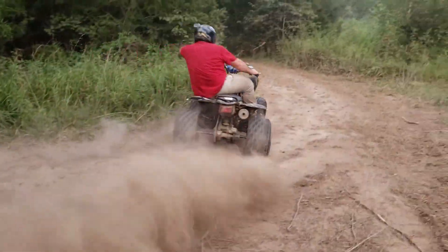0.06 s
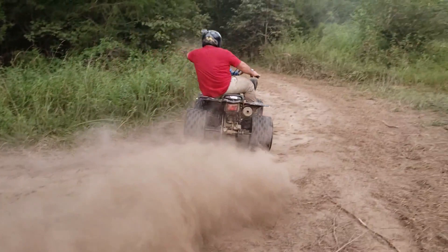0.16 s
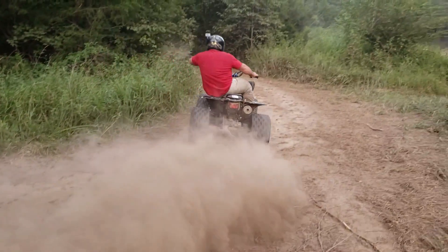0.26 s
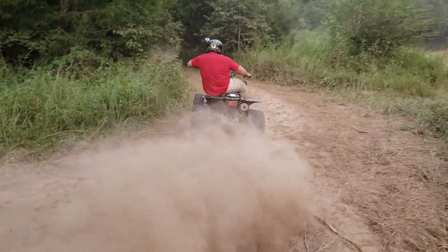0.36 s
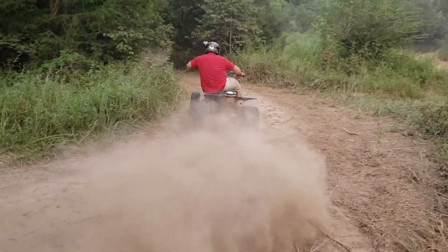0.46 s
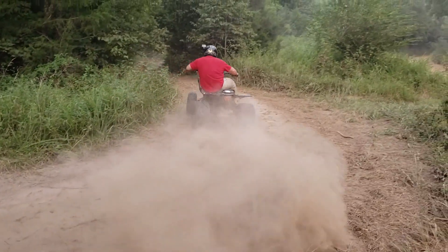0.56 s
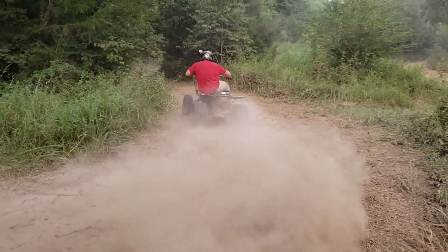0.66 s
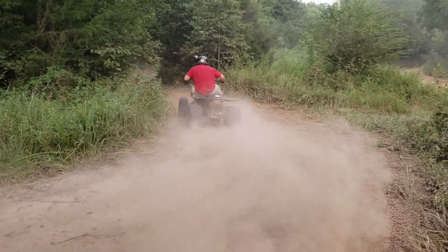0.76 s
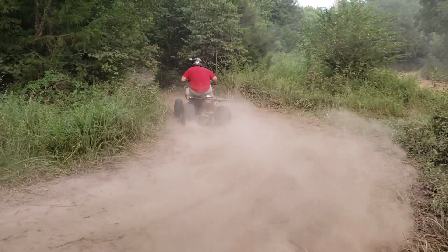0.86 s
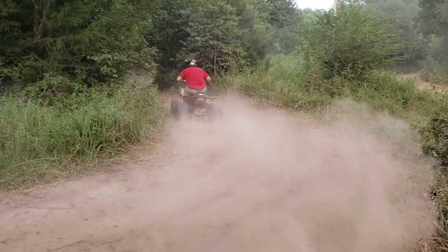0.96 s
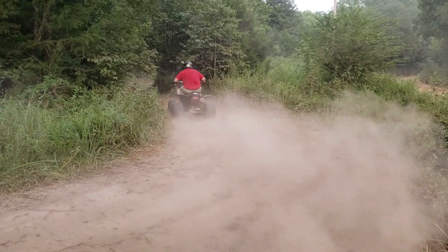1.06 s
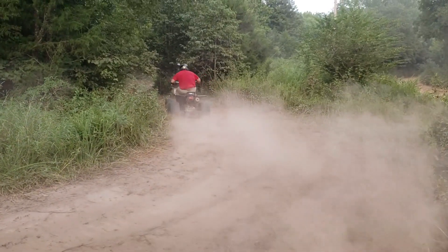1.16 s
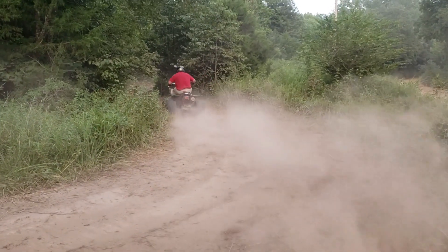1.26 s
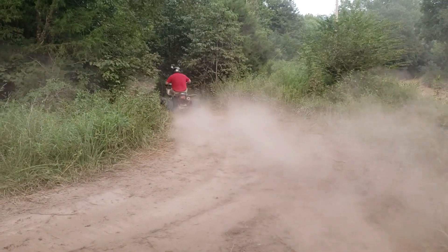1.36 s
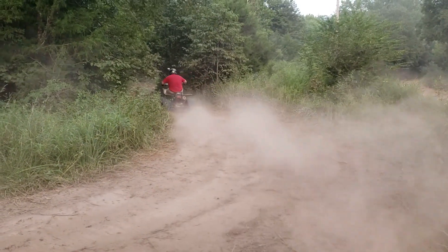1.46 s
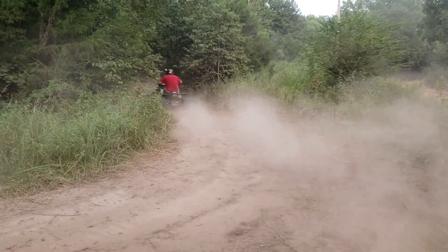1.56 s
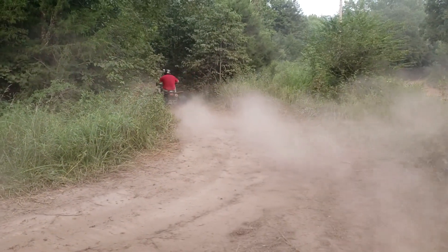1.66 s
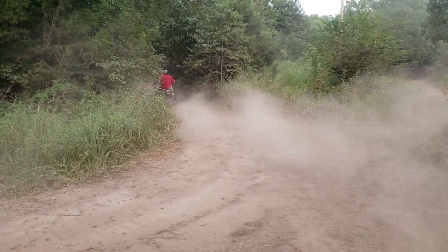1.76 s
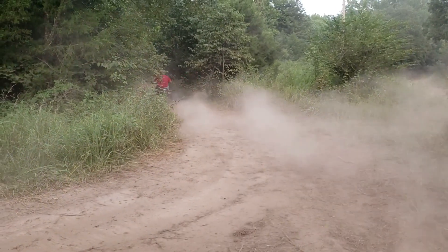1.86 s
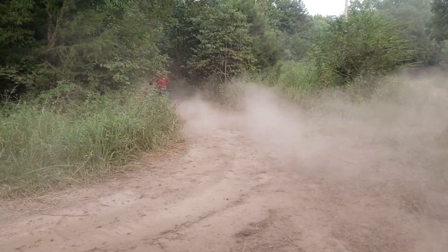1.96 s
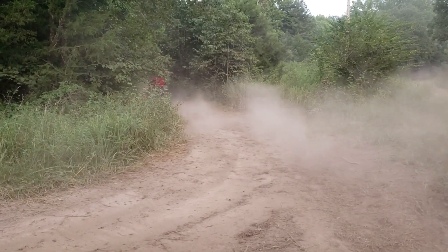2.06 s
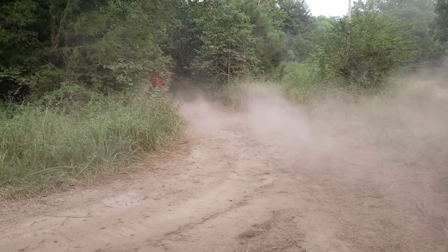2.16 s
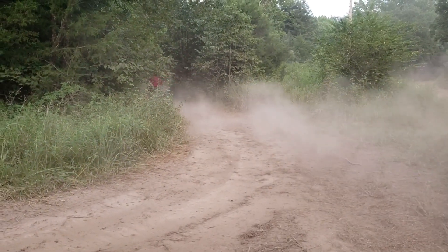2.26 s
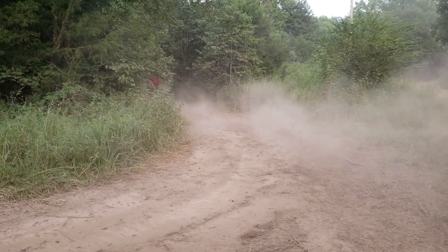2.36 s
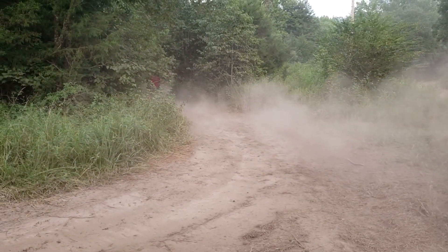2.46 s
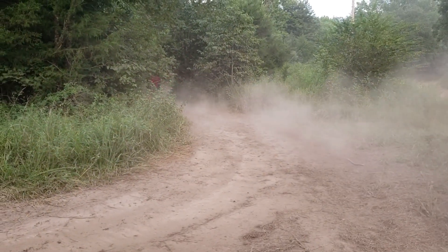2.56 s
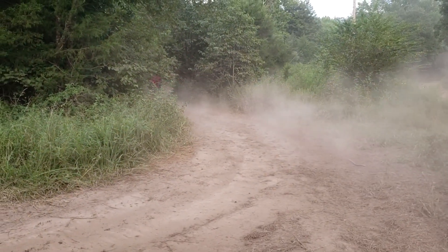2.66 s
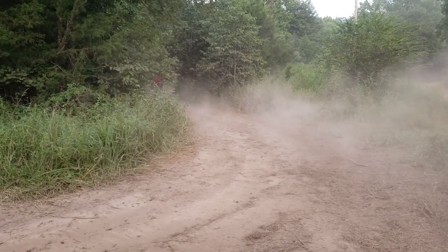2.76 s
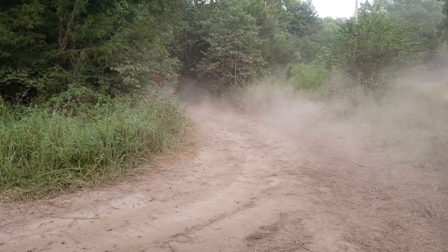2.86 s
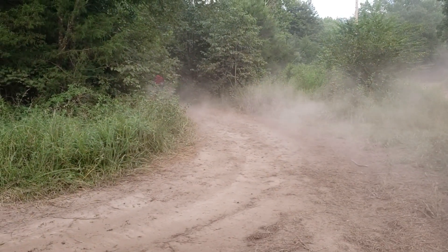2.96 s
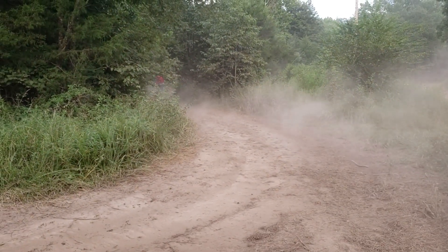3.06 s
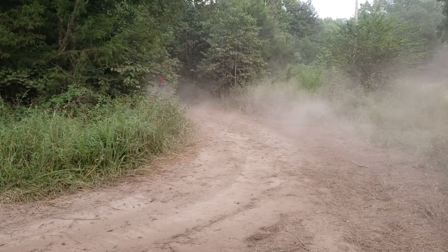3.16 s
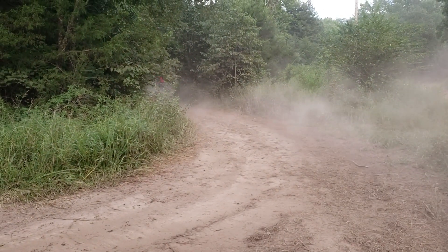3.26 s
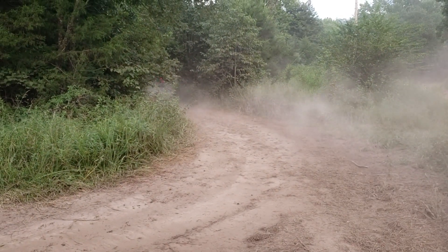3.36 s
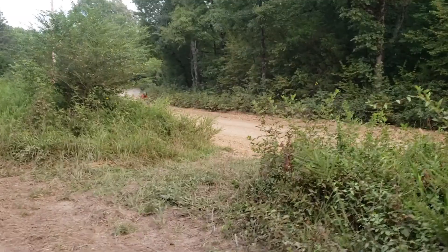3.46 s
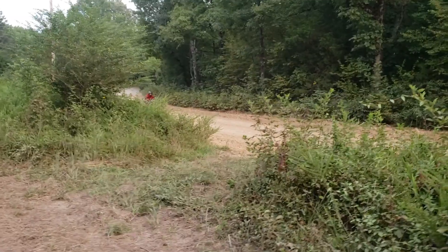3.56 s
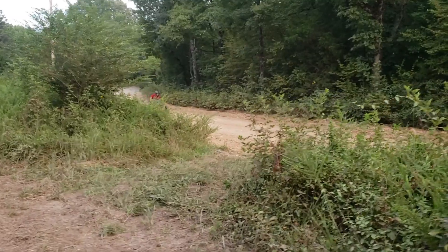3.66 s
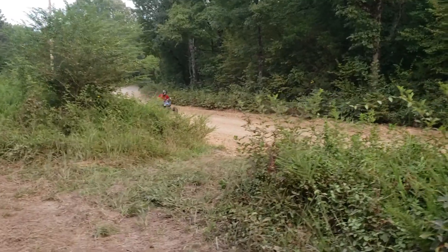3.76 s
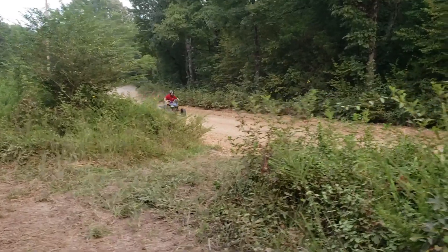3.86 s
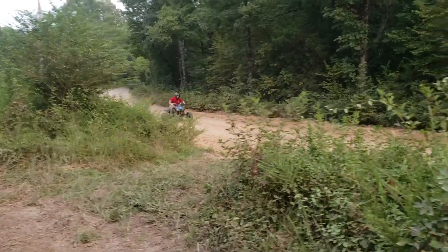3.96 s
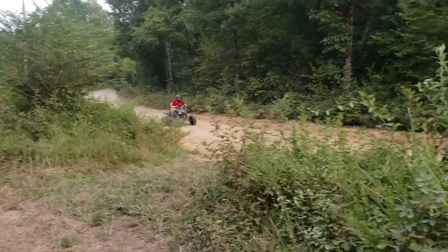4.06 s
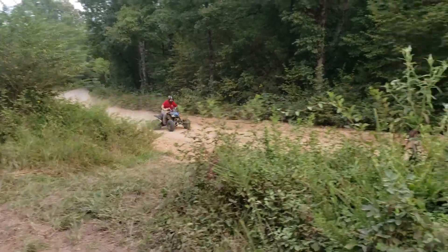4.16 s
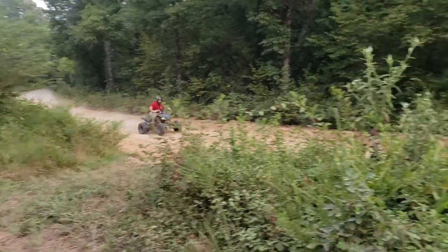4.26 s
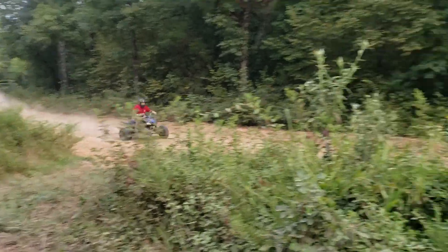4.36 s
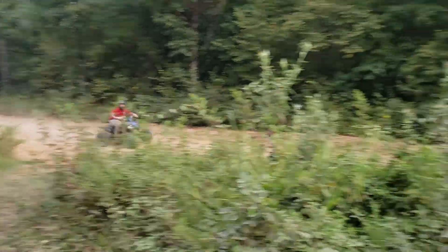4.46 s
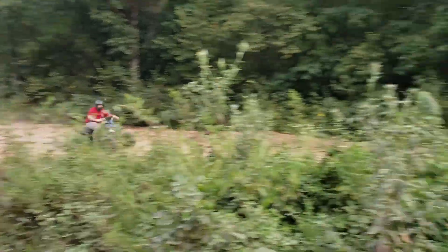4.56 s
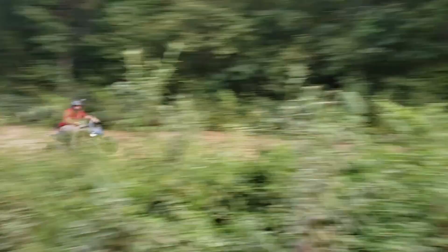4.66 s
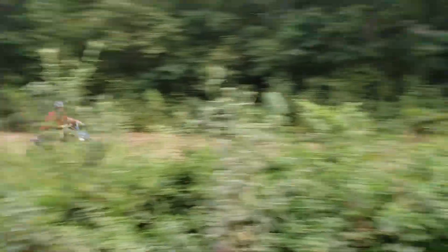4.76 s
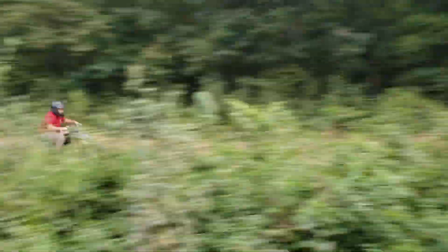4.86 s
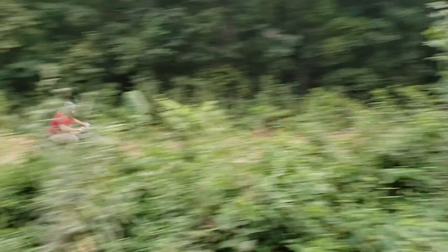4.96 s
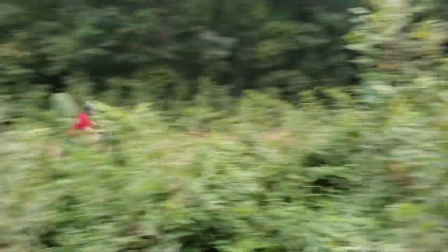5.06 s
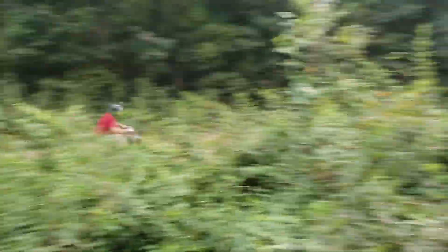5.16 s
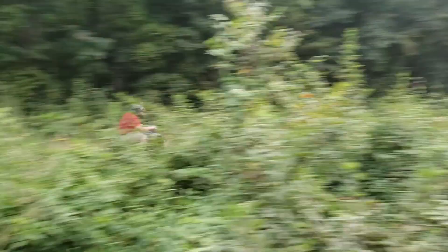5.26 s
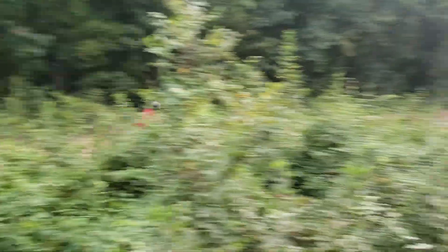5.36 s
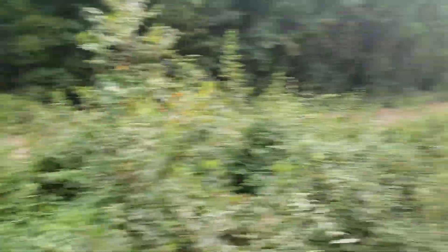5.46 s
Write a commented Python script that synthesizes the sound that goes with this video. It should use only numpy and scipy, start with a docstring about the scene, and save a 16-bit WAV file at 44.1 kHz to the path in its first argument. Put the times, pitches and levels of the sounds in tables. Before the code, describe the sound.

Raspy single-cylinder four-wheeler engine accelerates into the distance, shifting up once, then cuts abruptly to a ragged high-rev pass with another quick upshift.

```python
"""A dirt trail among trees: a single-cylinder quad bike, heard by a small two-port microphone.
First it pulls away with the tailpipe towards us, shifting up once; after a hard cut it comes past
side-on at full revs, firing unevenly, and shifts up again. The exhaust is a sum of firing orders, the
crack is noise in short jets through pipe resonances, roar and clatter are shaped noise, and a few
wavering partials hum beside the engine as it passes."""
import sys
import numpy as np
from scipy import signal
from scipy.io import wavfile
from scipy.ndimage import uniform_filter1d

SR = 44100
rng = np.random.default_rng(int(sys.argv[2]) if len(sys.argv) > 2 else 0)


def dump(signal):
    """Clip the signal to [-1, 1] and save it as 16-bit WAV at the path in sys.argv[1]."""
    limited = np.clip(np.atleast_2d(signal).T, -1, 1)
    pcm = np.round(limited * 32767).astype(np.int16)
    wavfile.write(sys.argv[1], SR, pcm)


N = 243431
CUT_S = 3.448  # hard cut between the two passes
FRAME = 512  # samples in a spectral frame


def amp(db):
    """Decibels to gain."""
    return 10 ** (np.asarray(db) / 20)


def evened(x):
    """Scales to rms 1."""
    return x / np.sqrt(np.mean(x ** 2) + 1e-20)


def read(points, hz):
    """Reads a table on a log-frequency axis."""
    f, value = np.transpose(points)
    return np.interp(np.log(hz + 1), np.log(f + 1), value)


def spectra(x):
    """Short-time spectra: bin frequencies, frame times, values."""
    return signal.stft(x, SR, nperseg=FRAME, noverlap=FRAME * 3 // 4)


def noise_pair(envelope):
    """Spectra of two independent white noises under one envelope: the common sound and one port's own."""
    return spectra(envelope * rng.standard_normal((2, len(envelope))))[2]


def firings(hz, depth, start):
    """Cycle count, strength of each firing and size of its gas jet; uneven firing also shifts the timing."""
    turns = np.cumsum(hz) / SR + start
    count = int(turns[-1]) + 3
    chance = rng.standard_normal((count, 3))
    place = np.arange(count)
    jitter = 0.025 * depth  # cycles
    turns = turns + jitter * np.interp(turns, place, chance[:, 2])
    strength = 1 + depth * np.interp(turns, place, chance[:, 0])
    size = amp(0.96 * chance[:, 1])
    return turns, strength, size


def exhaust(turns, hz, thumps, far, sharp_db, drone_db, thump_db, first_db, spread, skew):
    """One suction-like pulse a firing plus the drone at crank speed; spread smears it, upper orders first."""
    close, away = thumps
    upper = []
    for k in range(3, 23):
        colour_db = (1 - far) * read(close, k * hz) + far * read(away, k * hz)
        upper.append((k, amp(colour_db) * (k * hz < 950)))
    norm = np.sqrt(sum(a ** 2 for k, a in upper if k > 3) / 2)
    thump = 0
    for k, a in upper:
        # sharpness acts above 250 Hz, in full from 500 Hz; a shut throttle softens the pulse
        sharpened = a * amp(sharp_db * np.clip(k * hz / 250 - 1, 0, 1))
        phase = skew + spread * (k * hz / 600) ** 2
        thump = thump + sharpened * np.cos(2 * np.pi * k * turns + phase)
    # the crank turns twice for each firing
    drone = np.cos(4 * np.pi * turns + 2.54) + amp(first_db) * np.sin(2 * np.pi * turns)
    return amp(thump_db) * thump / norm + amp(drone_db) * np.sqrt(2) * drone


def puffs(turns, hz, size, open_s, tail_s, steady):
    """Envelope of the gas jet: opens just before the pulse, blows briefly, then dies away."""
    ahead = turns + 0.0013 * hz  # 1.3 ms early
    since_s = ahead % 1 / hz
    opening = np.minimum(since_s / 0.00031, 1)
    jet = opening * np.exp(-np.maximum(since_s - open_s, 0) / tail_s)
    return evened(size[ahead.astype(int)] * jet + steady)


def modes(table, hz, valley_db, top_hz):
    """Gain of a set of resonances over a valley floor, fading outside the pipe's band."""
    power = sum(amp(db) ** 2 / (1 + ((hz - f) / width) ** 2) ** 2 for f, width, db in table)
    band = hz ** 2 / (hz ** 2 + 1800.0 ** 2) / (1 + (hz / top_hz) ** 4)
    return evened(np.sqrt(power + amp(valley_db) ** 2) * band)


def crack(jet, crack_db, pipes, f, far, valley_db):
    """Hiss of the gas jets, coloured by the silencer's resonances, which change with direction."""
    close_pipe, far_pipe = (modes(p, f, valley_db, top_hz=5500)[:, None] for p in pipes)
    return noise_pair(amp(crack_db) * jet) * ((1 - far ** 2) * close_pipe + far ** 2 * far_pipe)


def roar(jet, roar_db, colour, f, far, throb, bright_db, churn_db, echo):
    """Roar of tyres, chain and engine scattered by the trees: shaped noise throbbing with the jets."""
    gain = amp(read(colour, f))
    gain /= np.sqrt(np.mean((gain * (f > 7000)) ** 2))  # level is set by the hiss above 7 kHz
    f = f[:, None]
    # a narrow bright band near 12 kHz and a low churning band near 700 Hz, strongest while close
    bright = bright_db * (1 - far) * np.exp(-((f - 12200) / 1500) ** 2)
    churn = churn_db * (1 - far) ** 2 * np.exp(-((f - 700) / 400) ** 2)
    # a close echo, from the ground or inside the pipe, cuts hollows 552 Hz apart once the bike is away
    comb = abs(1 + echo * far * np.exp(-2j * np.pi * f / 552) / (1 + (f / 4500) ** 4))
    return noise_pair(amp(roar_db) * (1 + throb * jet)) * gain[:, None] * amp(bright + churn) * comb


def clatter(jet, clatter_db, f, throb, clatter_hz):
    """Mechanical clatter: one broad band of noise throbbing with the jets."""
    gain = evened(np.exp(-((f - clatter_hz) / 1100) ** 2))
    return noise_pair(amp(clatter_db) * (1 + throb * jet)) * gain[:, None]


def bumps(f, frames, lumpy_db):
    """Gain of drifting patches in time and pitch; bumps in the trail make the low roar lumpier than the hiss."""
    patches = rng.standard_normal((len(f), frames))
    patches = evened(uniform_filter1d(uniform_filter1d(patches, size=30, axis=1), size=6, axis=0))
    patch_db = 1.5 + lumpy_db / (1 + (f / 900) ** 2)
    return amp(patch_db[:, None] * patches)


# How alike the two ports hear the noise. Each row: frequency in Hz, share common to both (0-1).
PORT_LIKENESS = [(100, 1), (400, .99), (800, .94), (1400, .75), (3000, .72), (5000, .55), (8000, .35),
                 (15000, .3)]


def two_ports(low, common, own, f, frame_s, balance, lags):
    """Spreads the sound over two ports that differ in colour, arrival time and part of their noise."""
    shared = np.clip(read(PORT_LIKENESS, f), 0, 1)[:, None]
    # the bike is left of the microphone, so the right port hears it later, more so as it moves round
    lag_ms = np.interp(frame_s, [0, frame_s[-1]], lags)
    delay = np.exp(-2j * np.pi * f[:, None] * lag_ms / 1000)
    tilt = amp(read(balance, f) / 2)[:, None]
    left = (low + common) * tilt
    right = (low + shared * common + np.sqrt(1 - shared ** 2) * own) * delay / tilt
    return signal.istft(np.array([left, right]), SR, nperseg=FRAME, noverlap=FRAME * 3 // 4)[1]


def ride(t, control, thumps, pipes, roar_colour, balance, lags, start, first_db, steady, throb, clatter_hz,
         valley_db, bright_db, echo, turn_s, spread, lumpy_db, churn_db):
    """One pass of the bike: exhaust, hum, crack, roar and clatter, as the two ports hear them."""
    hz, drone_db, thump_db, crack_db, roar_db, clatter_db, treble_db, depth, sharp_db = control
    # colours change as the bike turns away from the microphone: 0 before the turn, 1 after
    far = np.interp(t, turn_s, [0, 1])
    turns, strength, size = firings(hz, np.clip(depth, 0, 1), start)
    pulses = exhaust(turns, hz, thumps, far, sharp_db, drone_db, thump_db, first_db, spread, skew=2.3)
    f, frame_s, low = spectra(strength * pulses + hum(t))
    far = np.interp(frame_s + t[0], t, far)
    jet = puffs(turns, hz, size, open_s=0.0026, tail_s=0.0023, steady=steady)
    cracks = crack(jet, crack_db, pipes, f, far, valley_db)
    rush = roar(jet, roar_db, roar_colour, f, far, throb, bright_db, churn_db, echo)
    rush = rush + clatter(jet, clatter_db, f, throb, clatter_hz)
    noises = cracks + bumps(f, len(frame_s), lumpy_db) * rush
    # the treble brightens and dulls during each pass; the control is the gain at 12 kHz
    treble = np.interp(frame_s + t[0], t, treble_db)
    common, own = noises * amp(treble * (f[:, None] / 12000) ** 1.02)
    return two_ports(low, common, own, f, frame_s, balance, lags)[:, :len(t)]


# Gear shifts. Each row: start in seconds, length in seconds, how fully the throttle shuts (0-1).
GEAR_SHIFTS = [(2.229, 0.18, 1), (5.059, 0.053, 0.33)]


def throttle_shut(t):
    """0 on the gas, up to 1 during a shift: the throttle closes, stays shut, opens."""
    close_s, open_s = 0.06, 0.03
    shut = 0
    for start, length, fully in GEAR_SHIFTS:
        closing = np.clip((t - start) / close_s + 0.5, 0, 1)
        opening = np.clip((start + length - t) / open_s + 0.5, 0, 1)
        shut = shut + fully * closing * opening
    return shut


def controls(t, engine, layers, sharp_db, loaded_db, uneven):
    """The engine table sets speed and drone; the mix table and the throttle set the other layers."""
    hz, drone_db = (np.interp(t, np.transpose(engine)[0], c) for c in np.transpose(engine)[1:])
    thump_db, crack_db, roar_db, clatter_db, treble_db = (
        np.interp(t, np.transpose(layers)[0], c) for c in np.transpose(layers)[1:])
    shut = throttle_shut(t)
    # in each gear the pulse sharpens as the engine takes up the load, over 0.39 s
    engaged = np.array([t[0]] + [start + length for start, length, fully in GEAR_SHIFTS if start > t[0]])
    in_gear_s = t - engaged[np.searchsorted(engaged, t, "right") - 1]
    load = 1 - np.exp(-in_gear_s / 0.39)
    # a shut throttle lowers thump, crack and roar, raises the clatter, dulls the pulse and adds unevenness
    sharp_db = sharp_db + loaded_db * load - 11 * shut
    depth = uneven + 0.2 * shut + stumble(t)
    return (hz, drone_db, thump_db - 1.5 * shut, crack_db - 28 * shut, roar_db - 4.5 * shut,
            clatter_db + 2.5 * shut, treble_db, depth, sharp_db)


# Engine speed and effort. Each row: time in seconds, firings in Hz, drone in dB.
ENGINE_LEAVING = [(0.0, 42.15, -20.5), (0.29, 41.37, -23), (0.4, 40.66, -24.5), (0.59, 43.35, -23),
                  (0.75, 44.53, -24), (1.02, 44.68, -25.5), (1.23, 51.95, -23.5), (1.35, 50.77, -25),
                  (1.67, 56.43, -23.5), (2.1, 62.8, -23.5), (2.2, 65.5, -26.5), (2.26, 64.2, -30),
                  (2.28, 62.1, -31), (2.38, 62.96, -28.5), (2.44, 58.6, -25), (2.51, 54, -26.5),
                  (2.61, 53.02, -23.5), (2.67, 51.1, -30), (2.75, 52.82, -27.5), (2.94, 51.76, -29),
                  (3.4, 55.3, -28), (3.44, 54.73, -27)]
# Mix as distance and direction change, with the throttle open. Each row: time in seconds, thump in dB,
# crack in dB, roar in dB, clatter in dB, treble at 12 kHz in dB.
MIX_LEAVING = [(0, -20.5, -24.5, -43.5, -38.5, -1.7), (.35, -23, -31, -44, -45.5, -5.5),
               (.8, -26, -30.5, -46, -45, -0.5), (1.15, -28, -34, -44, -49, -4),
               (1.6, -29, -39, -44.5, -56, -3), (1.949, -32.5, -33, -48, -40, 2.3),
               (2.2, -36, -37, -44.5, -55, -3.5), (2.55, -30.5, -43.5, -44.5, -48, -3.5),
               (2.9, -32.5, -36, -44.5, -49, -3), (3.44, -34, -37, -46, -42, -4)]
# Low colour of the exhaust pulse, close and far behind. Each row: frequency in Hz, relative level in dB.
PULSE_CLOSE = [(120, -1), (170, 2.5), (215, -1), (300, 0), (350, -14.5), (450, -23.5), (530, -13),
               (700, -34), (900, -17)]
PULSE_FAR = [(150, -7), (210, 5.5), (270, -1.5), (330, -3), (420, -13), (520, -14.5), (650, -13.5),
             (760, -23), (900, -58)]
# Silencer resonances, close and far behind. Each row: centre in Hz, width in Hz, relative level in dB.
SILENCER_CLOSE = [(1200, 200, 1), (1810, 120, -7), (2240, 140, -6), (2870, 137, -2), (3460, 89, -5),
                  (4420, 350, -9.5), (5300, 390, -14.5)]
SILENCER_FAR = [(1107, 59.5, 0), (1643, 108, -2.5), (2194, 60, 2), (2750, 200, -7.5), (3395, 63, -4),
                (3950, 82, -6), (4330, 170, -12.5), (7800, 670, -10)]
# Colour of the roar from behind. Each row: frequency in Hz, relative level in dB per Hz.
ROAR_COLOUR_BEHIND = [(40, 0), (100, 18), (250, 20.5), (420, 4), (600, 6), (880, 2), (1500, 1), (3800, 3.5),
                      (6300, 0), (7600, 3), (8900, -5), (10800, -8.5), (12100, -4), (13500, -9.5),
                      (15600, -12.5)]
# Port balance from behind. Each row: frequency in Hz, left minus right in dB.
BALANCE_BEHIND = [(60, -3), (92, 3), (140, 4.5), (210, -1.5), (330, 2.5), (500, 5), (770, 0.5), (1170, 7.5),
                  (1790, 3), (2740, 0.5), (4190, -3.5), (6410, 6.5), (9810, -10), (15000, -0.5)]


def pull_away(t):
    """The bike heads off, tailpipe towards us: a strong pulse that thins as it turns and recedes."""
    control = controls(t, ENGINE_LEAVING, MIX_LEAVING, sharp_db=-1.0, loaded_db=6, uneven=0.02)
    # lags in ms, start in cycles, spread in radians at 600 Hz
    return ride(t, control, (PULSE_CLOSE, PULSE_FAR), (SILENCER_CLOSE, SILENCER_FAR), ROAR_COLOUR_BEHIND,
                BALANCE_BEHIND, lags=(0.01, 0.06), start=0.8, first_db=-12, steady=0.13, throb=0.33,
                clatter_hz=4250, valley_db=-19.5, bright_db=12.5, echo=0.5, turn_s=(0, 1.3), spread=2.16,
                churn_db=15.5, lumpy_db=1.5)


# A stumble of the engine. One row: middle in seconds, half length in seconds, added unevenness (0-1).
ENGINE_STUMBLE = (3.72, .15, .25)


def stumble(t):
    """Added unevenness of firing for a moment as the bike comes into view."""
    middle, half, extra = ENGINE_STUMBLE
    return extra * np.exp(-((t - middle) / half) ** 2)


# A hum beside the engine orders, probably the knobbly tyres.
# Each row: time in seconds, base pitch in Hz, level in dB.
HUM_PATH = [(3.6, 80.1, -41), (3.799, 83.15, -40), (3.999, 88.4, -31), (4.3, 90.2, -28.5), (4.6, 91.6, -30),
            (4.85, 90.5, -33), (5.05, 88, -27.5)]
# Partials of the hum. Each row: multiple of the base pitch, mean level in dB.
HUM_PARTIALS = [(1, -4.5), (2, -6), (4, -6), (6, -8)]


def hum(t):
    """A few wavering partials that fade in and out with the approach."""
    s, hz, level_db = np.transpose(HUM_PATH)
    turns = np.cumsum(np.interp(t, s, hz)) / SR
    waver = rng.standard_normal((len(HUM_PARTIALS), len(t)))
    for _ in range(2):
        waver = uniform_filter1d(waver, size=1500, axis=1)
    tones = 0
    for (k, db), w in zip(HUM_PARTIALS, evened(waver)):
        tones = tones + amp(db + 1.5 * w) * np.cos(2 * np.pi * k * turns + 0.67 * w)
    fade = np.clip((t - s[0]) / 0.089, 0, 1) * np.clip((s[-1] - t) / 0.064, 0, 1)
    return np.sqrt(2) * amp(np.interp(t, s, level_db)) * fade * tones


# Engine speed and effort. Each row: time in seconds, firings in Hz, drone in dB.
ENGINE_PASSING = [(3.47, 72.3, -27.5), (3.62, 71.56, -24.5), (3.63, 71.25, -25.5), (3.84, 71.23, -25.5),
                  (4.05, 69.77, -25.5), (4.34, 71.4, -21.5), (4.58, 69.8, -20.5), (4.6, 70.2, -27.5),
                  (4.73, 69.53, -15), (4.75, 69.97, -20), (4.96, 69.44, -16.5), (5.03, 68.3, -23.5),
                  (5.13, 71.34, -27), (5.19, 61.6, -14.5), (5.25, 58.2, -15.5), (5.3, 57.6, -17),
                  (5.47, 56.5, -18.5), (5.52, 54.3, -21)]
# Mix as distance and direction change, with the throttle open. Each row: time in seconds, thump in dB,
# crack in dB, roar in dB, clatter in dB, treble at 12 kHz in dB.
MIX_PASSING = [(3.45, -37, -47, -45, -35.5, -3), (3.75, -35.5, -36, -43.5, -38.5, -3),
               (4.0, -33.5, -33, -45, -41.5, 2), (4.3, -33, -29.5, -40, -42, 1.5),
               (4.65, -33.5, -44, -41, -34, 5.4), (4.85, -33.5, -29.5, -40, -32, 3),
               (5.0, -34.5, -34, -39, -33.5, 1.5), (5.1, -31, -39, -37.5, -42, -2),
               (5.3, -23.5, -26, -40.5, -39, 3), (5.52, -31, -31, -42.5, -52, 4)]
# Low colour of the exhaust pulse, side-on and once past. Each row: frequency in Hz, relative level in dB.
PULSE_SIDE = [(170, -29), (210, 4), (280, -6.5), (350, -11), (420, -7), (560, -7), (700, -9), (900, -56)]
PULSE_PAST = [(170, 3), (230, -2.5), (285, -2), (345, 2.5), (420, -19), (560, -11), (700, -16), (900, -15)]
# Silencer resonances, side-on and once past. Each row: centre in Hz, width in Hz, relative level in dB.
SILENCER_SIDE = [(570, 36, -6), (950, 100, -1), (1520, 26, 0), (2300, 110, -0.5), (3680, 460, -2.5),
                 (4440, 120, 0)]
SILENCER_PAST = [(700.4, 168, -7), (1089, 140, 11.5), (1500, 71, 6), (2110, 250, 2.5), (4550, 340, -29)]
# Colour of the roar from the side. Each row: frequency in Hz, relative level in dB per Hz.
ROAR_COLOUR_SIDE = [(40, 8), (140, 24), (330, 18), (560, 19), (780, 15), (1300, 14), (1900, 9), (3500, 11),
                    (6600, 0), (7500, 3), (9400, -9), (11000, -5), (12200, -2), (13400, -10), (15600, -13)]
# Port balance from the side. Each row: frequency in Hz, left minus right in dB.
BALANCE_SIDE = [(60, 5), (120, -1.5), (240, 3), (480, 2.0), (950, 1.5), (1890, 1.5), (3770, -2),
                (7520, 2.5), (15000, -5)]


def come_past(t):
    """The bike goes by side-on at full revs: uneven firing, smeared pulses, a quick turn of colour once past."""
    control = controls(t, ENGINE_PASSING, MIX_PASSING, sharp_db=-2.5, loaded_db=1.5, uneven=0.26)
    # lags in ms, start in cycles, spread in radians at 600 Hz
    return ride(t, control, (PULSE_SIDE, PULSE_PAST), (SILENCER_SIDE, SILENCER_PAST), ROAR_COLOUR_SIDE,
                BALANCE_SIDE, lags=(0.09, 0.22), start=0.91, first_db=-11.5, steady=1.0, throb=0.021,
                clatter_hz=4960, valley_db=-13.5, bright_db=-0.5, echo=0.067, turn_s=(5.08, 5.17), spread=13.9,
                churn_db=0.0, lumpy_db=1.1)


def scene():
    """The two passes, joined by a hard cut."""
    t = np.arange(N) / SR
    return np.hstack([pull_away(t[t < CUT_S]), come_past(t[t >= CUT_S])])


def record(dry):
    """The microphone drops the deepest bass; then a steep band limit at 15.77 kHz."""
    bass_cut = signal.butter(3, 42, "high", fs=SR, output="sos")
    edge = signal.firwin(1501, 15770, window=("kaiser", 9), fs=SR)
    return signal.oaconvolve(signal.sosfilt(bass_cut, dry), edge[None], "same")


dry = scene()
out = record(dry)
dump(out)
```